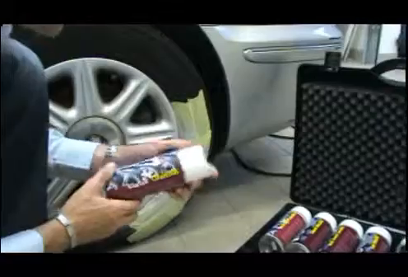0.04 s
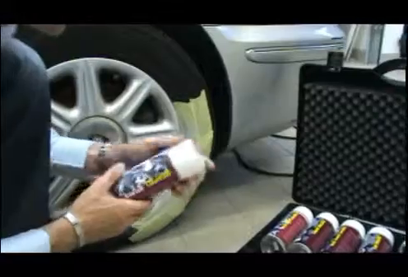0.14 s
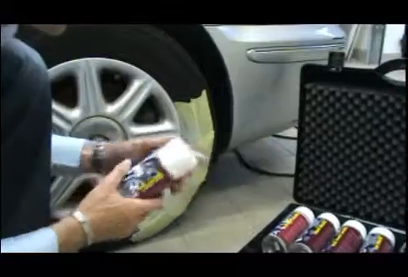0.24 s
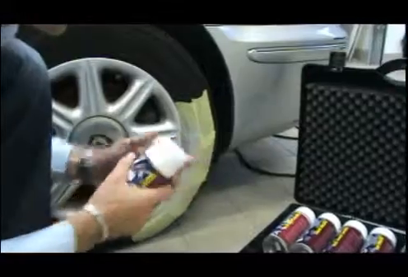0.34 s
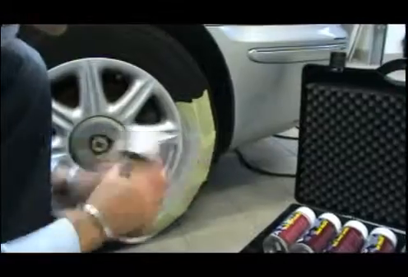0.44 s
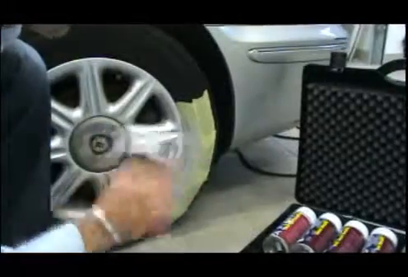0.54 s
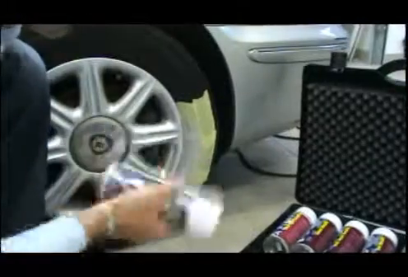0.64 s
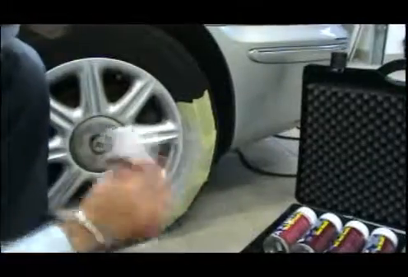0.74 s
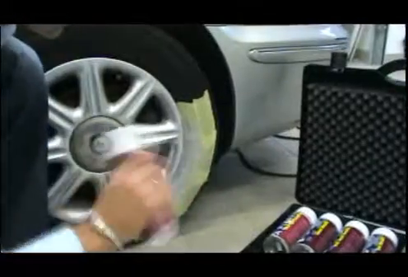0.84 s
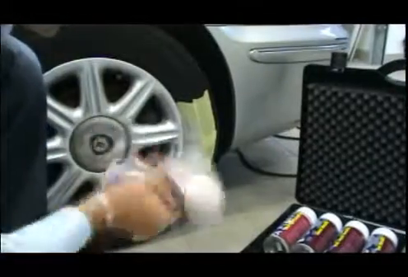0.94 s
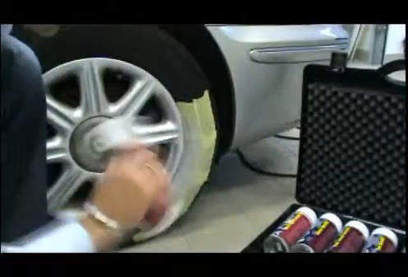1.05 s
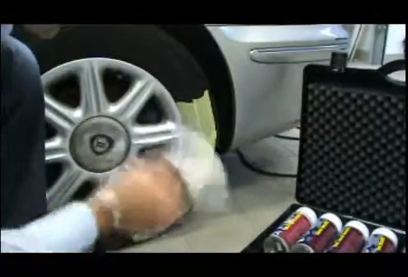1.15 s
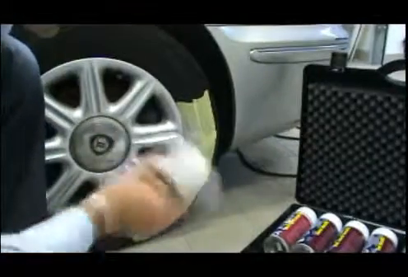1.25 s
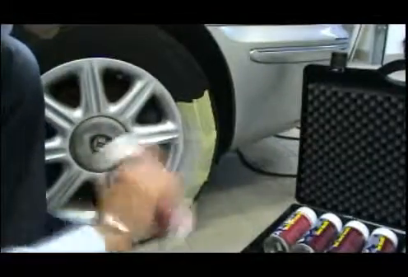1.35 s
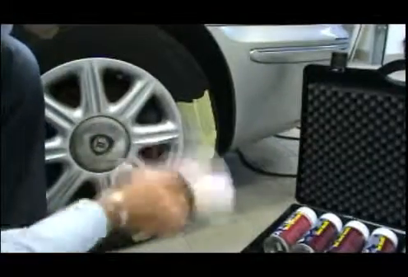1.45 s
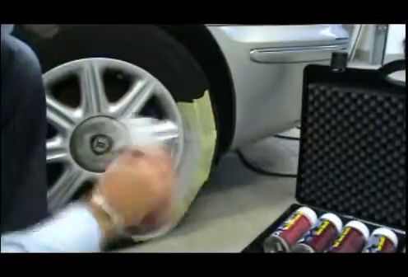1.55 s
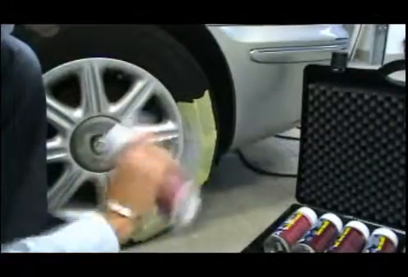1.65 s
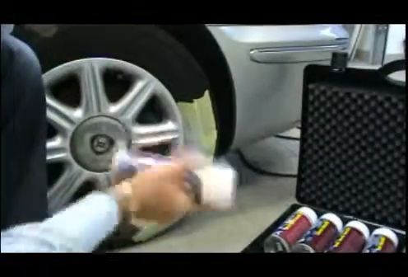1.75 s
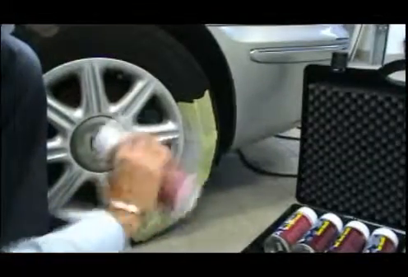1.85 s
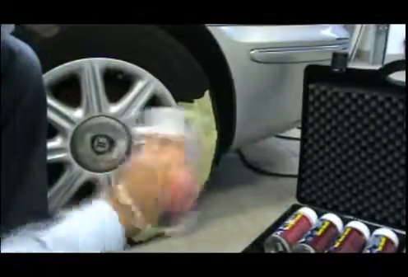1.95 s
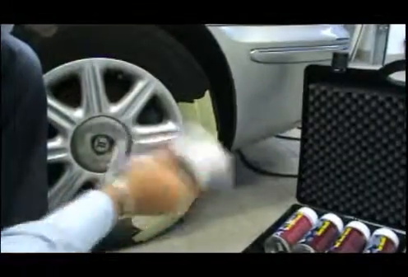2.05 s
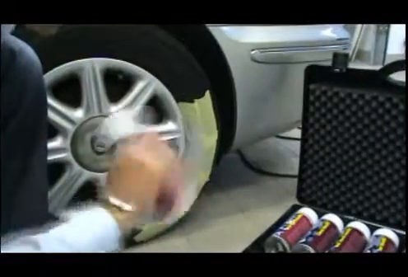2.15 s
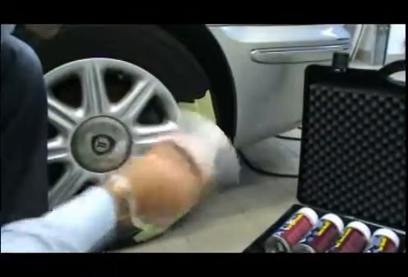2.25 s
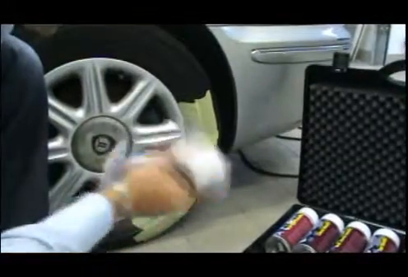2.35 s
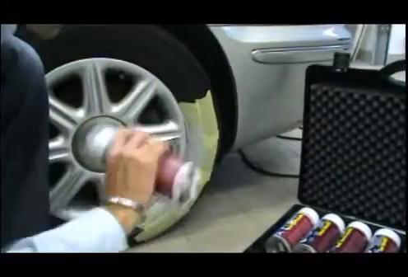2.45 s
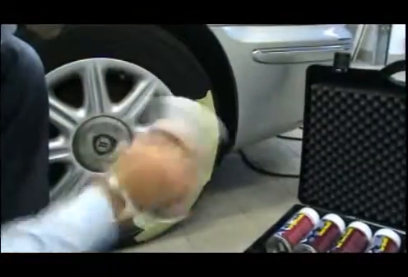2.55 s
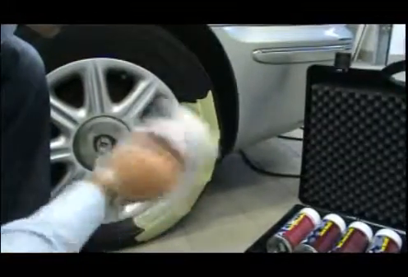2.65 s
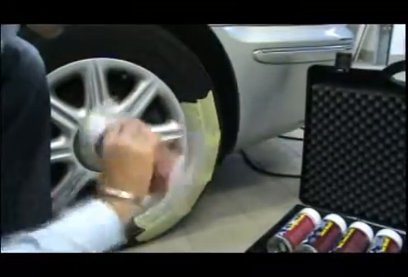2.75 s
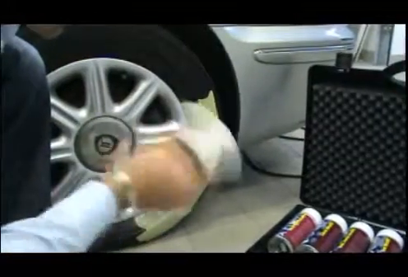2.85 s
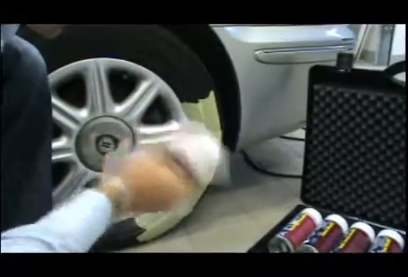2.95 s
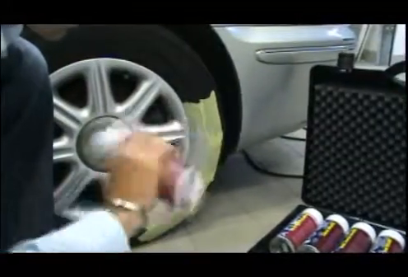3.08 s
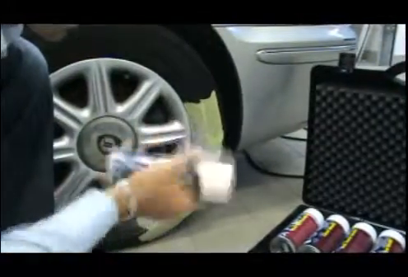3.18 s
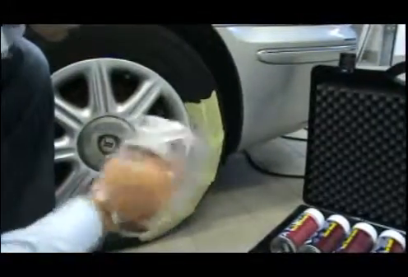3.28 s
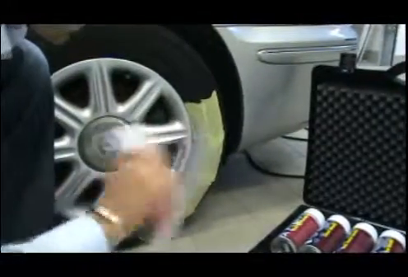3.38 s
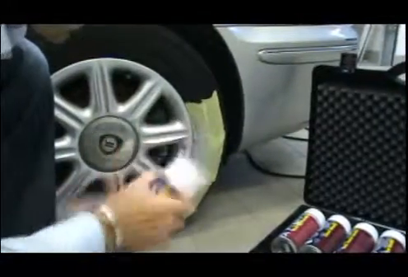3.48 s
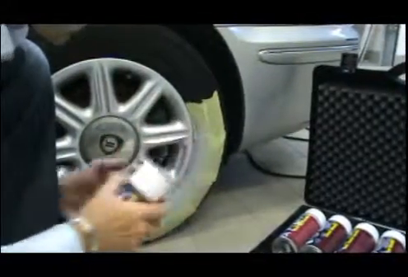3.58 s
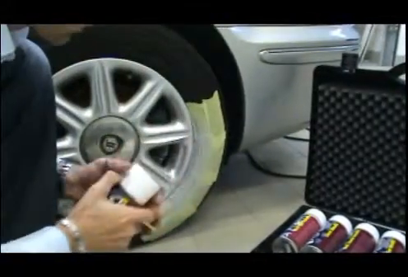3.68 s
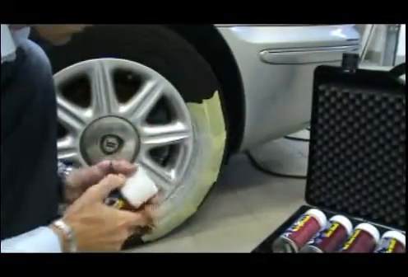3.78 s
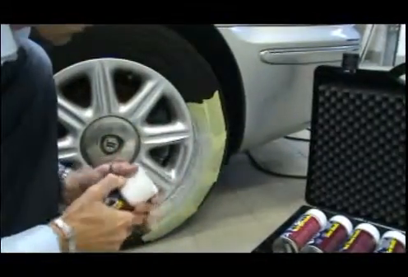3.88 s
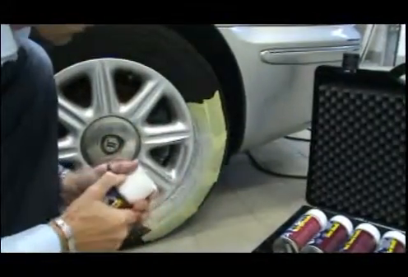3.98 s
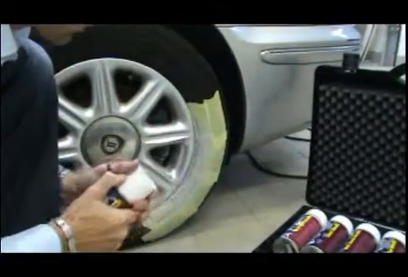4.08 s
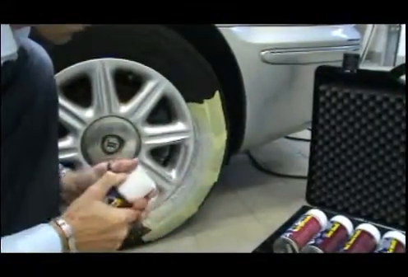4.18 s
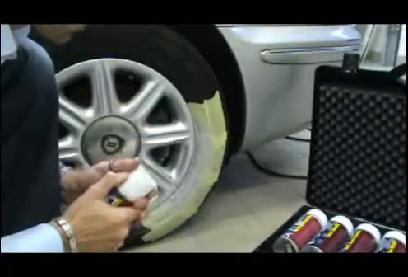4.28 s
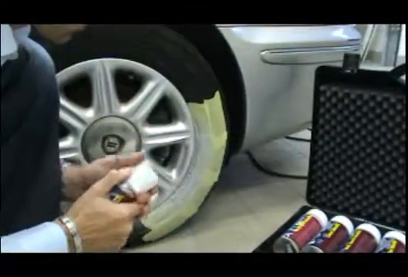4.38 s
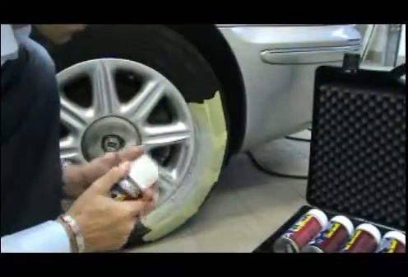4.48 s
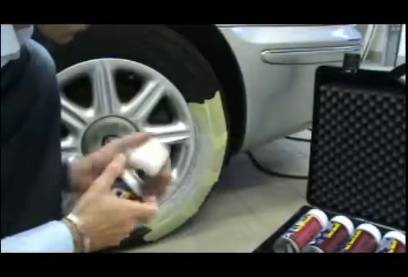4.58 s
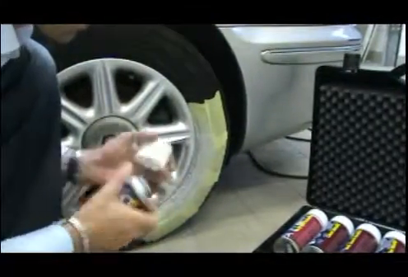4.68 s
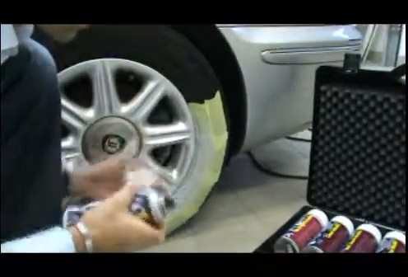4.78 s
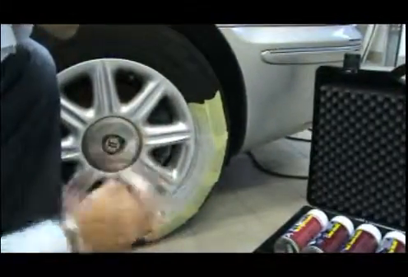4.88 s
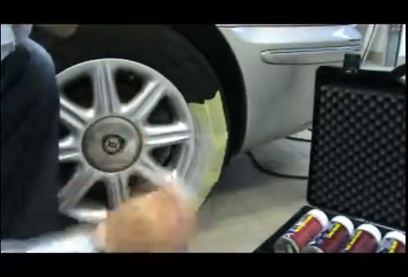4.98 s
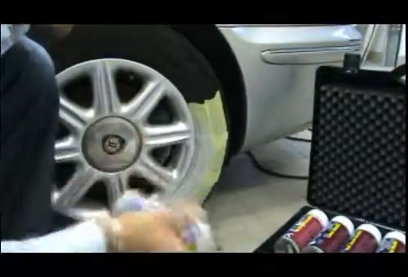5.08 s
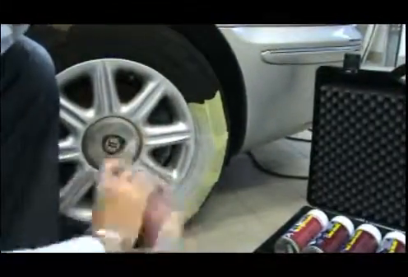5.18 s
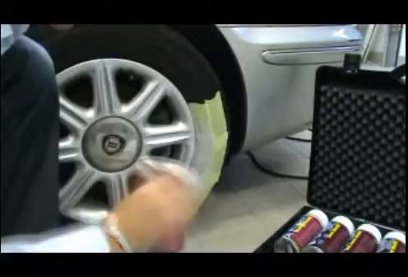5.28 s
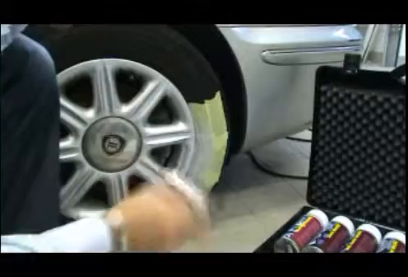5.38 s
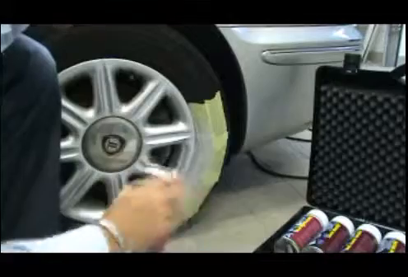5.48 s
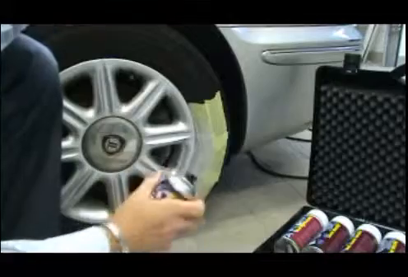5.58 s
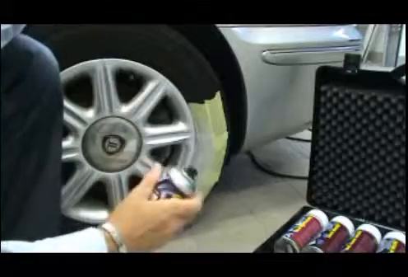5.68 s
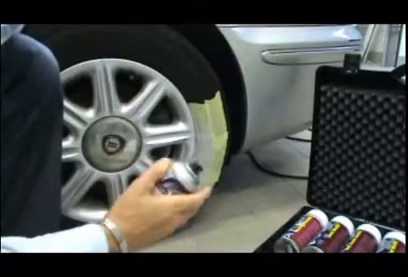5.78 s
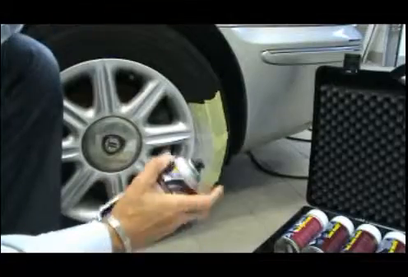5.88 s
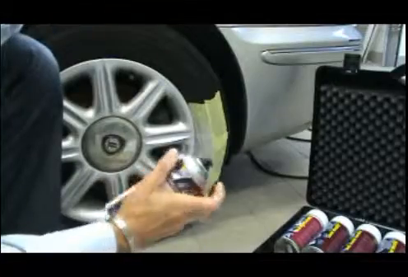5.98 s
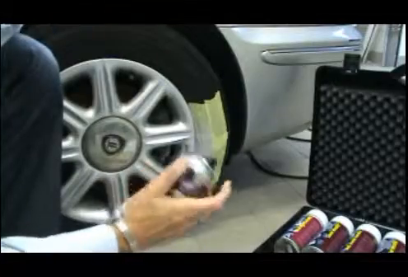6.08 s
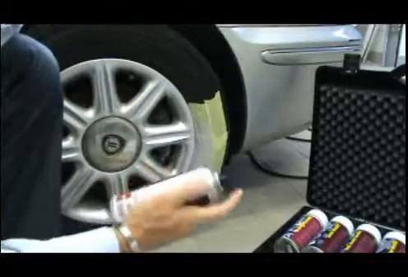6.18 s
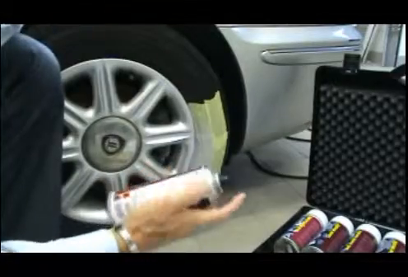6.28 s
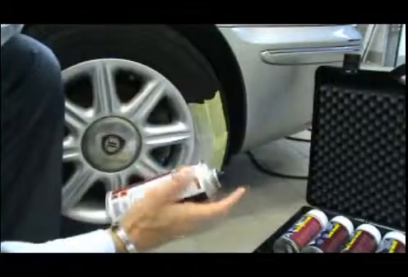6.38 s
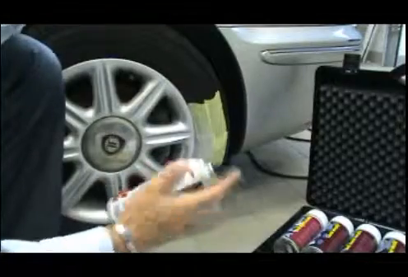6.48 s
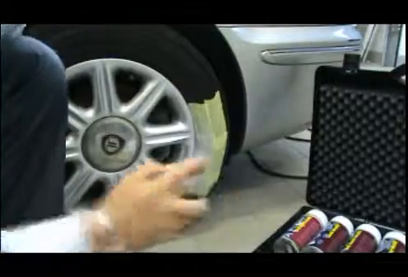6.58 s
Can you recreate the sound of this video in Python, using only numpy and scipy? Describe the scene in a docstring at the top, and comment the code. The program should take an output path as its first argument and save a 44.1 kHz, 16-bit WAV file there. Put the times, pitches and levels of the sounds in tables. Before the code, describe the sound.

A spray paint can is shaken hard, its mixing ball rattling; then the cap pops off hollowly and the can is shaken briefly again.

```python
"""Workshop: a can of spray paint is shaken by hand, its mixing ball rattling on the wall and domed ends.
The shaking dies down, the plastic cap comes off with a hollow pop, and the can is shaken again and turned over.
Strikes are noise bursts through steel modes; damped sines make the cap's air; shaped noise makes sleeves and still air.
Echoes, a treble reflection to one side and a short diffuse tail form the room."""
import sys
import numpy as np
from scipy import signal
from scipy.fft import rfft, irfft
from scipy.io import wavfile

SR = 44100
rng = np.random.default_rng(int(sys.argv[2]) if len(sys.argv) > 2 else 0)


def transcribe(signal):
    """Save signal, clipped to [-1, 1], as a 16-bit WAV file at the path in sys.argv[1]."""
    frames = np.atleast_2d(signal).T
    limited = np.clip(frames, -1, 1)
    pcm = np.round(limited * 32767).astype(np.int16)
    wavfile.write(sys.argv[1], SR, pcm)


N = 292383
TIME_S = np.arange(N) / SR

# still air, relative spectrum: [f/Hz, density/dB per Hz]
AIR_SPECTRUM = [(20, -8), (50, 8), (200, 0.5), (600, -2.5), (1800, -3), (6500, -3), (14000, -8)]
# diffuse tail by band: [f/Hz, t60/s, level/dB, side relative to mid/dB]
ROOM_TAIL = [(103.5, 0.71, -4, -14), (298, 0.86, -5, -1.5), (796, 0.6, -7.5, -4.5), (2020, 0.51, -9, -10.5),
             (5770, 0.49, -14.5, -5), (12700, 0.21, -10, -33)]
# echoes from the floor and the car body: [delay/s, level/dB, cut-off f/Hz]
ROOM_ECHOES = [(.0085, -21, 8700), (0.031, -23, 6740)]
# sleeve cloth, relative spectrum: [f/Hz, density/dB per Hz]
CLOTH_SPECTRUM = [(60, -30), (200, -19), (1300, -3.5), (2100, 1.5), (3000, 0.5), (4400, 3.5), (6000, -2.5),
                  (8000, -5), (13000, -7.5)]
# the arm moves and the sleeves rub: [from t/s, to t/s, level/dB]
ARM_MOVES = [(0.183, 0.552, -62.5), (0.906, 3.45, -53), (4.979, 5.03, -56.5), (5.105, 5.297, -51),
             (6.138, 6.301, -60.5)]
# ball rolls or palm slides, one resonance sings: [from t/s, to t/s, f/Hz, width/Hz, level/dB]
RUBS = [(0, 0.286, 4300, 1000, -68.5), (0.45, 0.56, 4300, 170, -49), (0.545, 0.593, 6300, 120, -49),
        (0.703, 0.738, 4270, 130, -41.5), (6.24, 6.35, 1279, 130, -71)]
# strike coupling to the cap and the air under it, gone once the cap is off: [t/s, gain/dB]
CAP_COUPLING = [(.78, -34), (.84, -17), (3.0, -14), (4.25, -10.5), (4.32, -72)]
# air in the cap as it comes off: [f/Hz, level/dB, t60/s]
POP_MODES = [(131, -43, 0.15), (214, -27, 0.036), (272.2, -37.5, 0.061), (451, -39, 0.061),
             (710, -21, 0.044), (779, -23, 0.073)]
# resonances of the steel ends: [f/Hz, width/Hz, level/dB]
END_MODES = [(1035, 96, -6), (1395, 353, -3.5), (1770, 205, 3), (2220, 270, 3.5), (2835, 242, 0)]
# resonances of the steel wall: [f/Hz, width/Hz, level/dB]
WALL_MODES = [(4030, 1260, -8.5), (5180, 135, -7), (5530, 520, -4.5), (6610, 740, -0.5), (7500, 530, -1.5),
              (8130, 170, -3.5), (11130, 270, -11), (12500, 1200, -10.5)]
# sharp rings of the can, damped by a firm hand; up to 3 kHz the gas inside rings, above it the steel wall:
# [f/Hz, width/Hz, gain/dB]
CAN_RINGS = [(1770, 50, 12), (2195, 130, 10), (2600, 120, 9), (3020, 110, 10), (4285, 70, 13),
             (6275, 40, 3), (7500, 110, 2), (8760, 120, 5)]
# how loosely the can is held: [t/s, ring gain/dB]
LOOSENESS = [(.79, 0), (.84, -26)]
# strike on an end, tail soon damped by the paint: [crack/s, tail level/dB, tail/s]
END_BLOW = (0.0043, -0.84, 0.0094)
# strike on the wall, tail damped likewise: [crack/s, tail level/dB, tail/s]
WALL_BLOW = (0.0033, -2.5, 0.0098)
# shaking effort, 0 at full swing: [t/s, level/dB]
EFFORT = [(.37, 1), (.47, -4.5), (.68, -0.5), (3.45, -1), (3.7, -8), (3.9, -9.5), (5.09, -0.5), (5.48, 2),
          (5.6, -2)]
# how freely the ball skips after a strike: [t/s, level/dB]
SKIPPING = [(.75, -5), (1.0, 0), (4.2, 0), (5.3, -7)]
# aim of wall strikes as the can is tipped and gripped; lower is brighter: [t/s, aim/dB]
WALL_AIM = [(.85, -22), (1.0, -14), (1.25, -8), (3.4, -5), (5.1, -14.5)]
# shakes, about seven a second within a bout; ball meets an end, may bounce, flies to the wall, rattles:
# [t/s, aim/dB (above 0 dull ends, below 0 bright wall), end bounce/s (0: none), flight/s,
#  first wall bounce/s, wall bounces/count]
SHAKES = [(.365, -21.5, 0.028, 0.1, .018, 1), (.667, 0.5, 0, 0.036, 0.016, 3),
          (.784, 2.5, .014, 0.058, .011, 1), (.949, 3.5, 0.012, 0.053, .026, 1),
          (1.0598, 3.5, .01, .059, .0087, 1), (1.1985, 5, 0.015, 0.025, 0.013, 3),
          (1.329, 5, 0.00014, 0.051, .0277, 1), (1.461, 4, 0.024, .052, 0.02, 2),
          (1.5996, 2, 0, 0.039, .0236, 1), (1.751, 5, 0.00031, 0.035, 0.052, 1),
          (1.88, 8.5, 0.008, 0.074, .0254, 2), (2.023, 4, .016, .037, 0.014, 1),
          (2.144, 0.5, 0.021, 0.081, 0.026, 1), (2.295, -8, 0.000087, 0.081, 0.013, 1),
          (2.456, 6.5, 0, 0.032, 0.04, 1), (2.596, -0.5, 0, .048, .047, 1), (2.765, 9, 0, 0.03, .015, 1),
          (2.846, -1, 0.00066, 0.011, .0146, 2), (2.945, -2.5, 0.00054, 0.036, 0.029, 1),
          (3.0474, 6, 0, 0.032, 0.031, 4), (3.222, -2.5, 0, .037, .0135, 2),
          (3.372, -6.5, 0.00074, .0407, .056, 1), (3.613, 8, 0.00065, 0.043, 0.013, 1),
          (3.71, 10, 0, .027, 0.025, 1), (3.81, -3.5, 0.01, .045, 0, 0),
          (5.088, -0.5, 0.017, 0.031, 0.014, 1), (5.198, -1.5, 0, .051, 0.027, 1),
          (5.418, 6.5, 0, .03, 0, 0), (5.483, 8, 0.022, .046, 0.058, 1)]
# further strikes of the ball: bounces and chatter within the shakes, lone knocks between them and in
# handling: [t/s, level/dB, aim/dB]
FURTHER_STRIKES = [(.453, -36, -16), (.511, -37.5, -18), (0.52, -39, -14), (.535, -38, -18),
                   (.549, -37, -22), (.567, -39.5, -21), (.58, -39.5, -20), (.691, -31.5, -7),
                   (.868, -36, 6), (0.9117, -36, 14), (.925, -31.5, -21), (.977, -37.5, 8),
                   (1.1705, -34, 6), (1.296, -30.5, -11), (1.344, -37.5, 9), (1.39, -36, -1),
                   (1.44, -32.5, -13), (1.54, -32.5, 0), (1.7, -35.5, -9), (1.716, -31.5, -10.5),
                   (1.806, -36.5, 6), (1.831, -35, 9), (1.8544, -34, -8), (1.924, -39.5, 14),
                   (1.946, -38.5, 1), (1.9896, -32, -5.5), (2.117, -31.5, -1), (2.177, -36, 8),
                   (2.281, -35, -7), (2.4158, -35, -9), (2.428, -35, -8), (2.556, -33.5, -2),
                   (2.5766, -34, -7.5), (2.704, -37.5, -3), (2.716, -38, -4), (2.727, -34.5, -4),
                   (2.817, -35, -16), (2.838, -36, -5), (2.991, -36.5, 1), (3.306, -37.5, 0),
                   (3.555, -31, -4.5), (3.568, -34, -2), (3.586, -37, 0), (3.886, -47.5, 2),
                   (3.935, -36.5, 2), (3.951, -40, -11), (3.959, -41, -5.5), (3.9985, -44, -2),
                   (4.008, -39, -12), (4.038, -46, -9), (4.047, -39.5, -3), (4.076, -48, 13),
                   (4.091, -45, -3), (4.126, -49, -10), (4.135, -42.5, -5), (4.419, -38.5, 2),
                   (4.436, -44.5, -9), (4.485, -39.5, -6), (4.54, -43, -9.5), (4.995, -37.5, -8),
                   (5.0145, -39, -15), (5.024, -36, -14), (5.05, -38, -17), (5.1313, -33.5, -11),
                   (5.1528, -38.5, -6), (5.159, -31.5, -11), (5.216, -38, 4), (5.287, -36, -3),
                   (5.3606, -30.5, 4.5), (5.436, -37, 5), (5.555, -40.5, 7), (5.578, -40, 5),
                   (5.676, -40, 7), (5.693, -31, -9), (5.714, -44, 11), (5.769, -40.5, -2),
                   (5.8113, -34.5, -7), (5.8215, -35, -7), (5.8656, -41, 4), (5.917, -37.5, -8),
                   (5.973, -42.5, -13), (5.988, -32, -12.5), (6.107, -45, -11), (6.136, -41.5, -11),
                   (6.162, -48, -17), (6.1746, -37, -12), (6.2142, -41, -9.5), (6.243, -48, 8),
                   (6.26, -47, -13), (6.271, -42.5, -8.5), (6.318, -41, -11.5), (6.347, -51, -6),
                   (6.371, -49.5, -6.5), (6.41, -52, -13)]

SHAKES_PER_S, SWING_SHARE = 7, .25   # the can swings by this share of its distance from the wheel
SLEEVE_SWELL_S, SLEEVE_FADE_S = 0.034, 0.13
CAP_HZ, CAP_T60_S, CAP_DETUNE = 720, .1, .011   # detune: spread as a share of pitch
POP_S, SLIP_LEAD_S = 4.390, .038   # the rim slips this long before the pop
SETTLE_FROM_S, SETTLE_TO_S = 4.158, 4.245   # the ball comes to rest
# strikes at full swing; a gentle shake barely carries the ball to the end
END_DB, END_FOLLOWS_DB_PER_DB, WALL_DB = -30.5, 1.23, -28.5
# each bounce is weaker; the gaps close in on a steady chatter
BOUNCE_LOSS_DB, CHATTER_S, GAP_KEPT = 1.1, .016, .3
# strike-to-strike spread of mode level, and of pitch as a share
MODE_VARY_DB, END_DETUNE, WALL_DETUNE = 4, .06, .025
PEAK_TOP, CUTOFF_HZ = .22, 14600   # peaks are rounded toward this share of full scale


def from_db(db):
    """Level in dB to amplitude."""
    return 10 ** (np.asarray(db) / 20)


def rms_one(x):
    """Scale to rms 1."""
    return x / np.sqrt(np.mean(x ** 2) + 1e-20)


def in_time(rows, s=TIME_S):
    """A curve read at the times s."""
    return np.interp(s, *np.transpose(rows))


def at_hz(points, hz, axis=1):
    """One column of a spectrum, read on a log-frequency axis."""
    points = np.array(points)
    return np.interp(np.log(np.maximum(hz, 1)), np.log(points[:, 0]), points[:, axis])


def butter(x, hz, kind, order=2):
    """Butterworth filter."""
    sos = signal.butter(order, np.minimum(hz, .48 * SR), kind, fs=SR, output="sos")
    return signal.sosfilt(sos, x)


def noise(spectrum):
    """Noise of the given colour, rms 1."""
    hz = np.arange(N // 2 + 1) * SR / N
    colour = from_db(at_hz(spectrum, hz))
    return rms_one(irfft(rfft(rng.standard_normal(N)) * colour, N))


def resonate(x, hz, width_hz):
    """A two-pole resonance with gain 1 on top."""
    r = np.exp(-np.pi * width_hz / SR)
    zeros = np.array([1, 0, -1]) * (1 - r * r) / 2
    poles = [1, -2 * r * np.cos(2 * np.pi * hz / SR), r * r]
    return signal.lfilter(zeros, poles, x)


def decay_60(t, t60_s):
    """Exponential decay, -60 dB at t60_s."""
    return np.exp(-np.log(1000) * t / t60_s)


def swell(start_s, stop_s, swell_s, fade_s):
    """An envelope that rises, holds from start to stop, and fades."""
    return np.exp(np.minimum(0, np.minimum((TIME_S - start_s) / swell_s, (stop_s - TIME_S) / fade_s)))


def place(times_s, sounds):
    """Short sounds, one a row, laid out at their times."""
    out = np.zeros(N + sounds.shape[1])
    for at, sound in zip(np.clip(times_s * SR, 0, N).astype(int), sounds):
        out[at:at + len(sound)] += sound
    return out[:N]


def still_air():
    """Coloured noise, common to both sides plus a weaker part of opposite sign."""
    return noise(AIR_SPECTRUM) + .2 * noise(AIR_SPECTRUM) * np.array([[1], [-1]])


def room_tail(t, band_count=9):
    """Diffuse mid and side responses: banded noise that mostly dies sooner in the treble."""
    edges_hz, tail = np.geomspace(40, 16000, band_count + 1), 0
    for low, high in zip(edges_hz, edges_hz[1:]):
        t60_s, db, side_db = (at_hz(ROOM_TAIL, np.sqrt(low * high), axis=k + 1) for k in range(3))
        decay = (1 - np.exp(-t / 0.00095)) * decay_60(t, t60_s)
        gain = from_db([[db], [db + side_db]]) / np.linalg.norm(decay)
        tail = tail + gain * decay * butter(rng.standard_normal((2, SR)), [low, high], "band")
    return tail


def workshop(x, wheel_s=0.0023, wheel_db=-12, wheel_hz=(5000, 11000)):
    """Direct sound, echoes, a treble reflection to one side and a diffuse tail; two channels."""
    tail = room_tail(TIME_S[:SR])
    mid, side = signal.fftconvolve(x[None], tail, axes=1)[:, :N]
    echoes = sum(from_db(db) * np.interp(TIME_S - s, TIME_S, butter(x, hz, "low"), left=0)
                 for s, db, hz in ROOM_ECHOES)
    # a wheel's spokes reflect treble from one side, sooner or later as the can swings
    delay_s = wheel_s * (1 + SWING_SHARE * np.sin(2 * np.pi * SHAKES_PER_S * TIME_S))
    wheel = from_db(wheel_db) * np.interp(TIME_S - delay_s, TIME_S, butter(x, wheel_hz, "band"), left=0)
    return x + echoes + mid + (side + wheel) * np.array([[1], [-1]])


def sleeves():
    """Cloth noise swells with each move of the arm, holds, and fades after it."""
    envelope = sum(from_db(db) * swell(start, stop, SLEEVE_SWELL_S, SLEEVE_FADE_S)
                   for start, stop, db in ARM_MOVES)
    return noise(CLOTH_SPECTRUM) * envelope


def hand_bump(at_s, db, swell_s=0.021, fade_s=0.062):
    """The hand lets go of the cap, or grips the can anew: a soft, dull noise bump."""
    late_s = TIME_S - at_s
    envelope = np.exp(-np.maximum(-late_s / swell_s, late_s / fade_s))
    return from_db(db) * envelope * noise([(30, -20), (115, -9.0), (600, -18.5), (2000, -20), (5000, -38)])


def rubbing(swell_s=0.014, fade_s=0.022):
    """Rolling and sliding contact keeps single resonances of the can singing."""
    out = 0
    for start, stop, hz, width_hz, db in RUBS:
        tone = resonate(resonate(rng.standard_normal(N), hz, width_hz), hz, width_hz)
        out = out + from_db(db) * swell(start, stop, swell_s, fade_s) * rms_one(tone)
    return out


def cap_force(s, db, aim_db):
    """The share of each strike that reaches the cap: much from the wall, little from the ends."""
    wall_loss_db = 20 * np.log10(1 + from_db(aim_db) ** 2)
    return from_db(db - wall_loss_db + in_time(CAP_COUPLING, s))[:, None]


def cap_hum():
    """Strikes on the wall set the air under the cap humming, each with its own strength and pitch."""
    s, db, aim_db = strikes()
    t = TIME_S[:SR // 4]
    vary_db, bend = rng.normal(0, [2, CAP_DETUNE], (len(s), 2)).T[:, :, None]
    hum = np.sin(2 * np.pi * CAP_HZ * (1 + bend) * t) * decay_60(t, CAP_T60_S)
    return butter(place(s, cap_force(s, db, aim_db) * from_db(vary_db) * hum) + 1e-18, 410, "high")


def cap_pop(snap_db=-33, slip_db=-59, open_s=0.0016):
    """The plastic rim slips, then snaps over its bead; the air in the cap rings up as the gap opens."""
    at_s, t = np.array([POP_S]), TIME_S[:SR // 4]
    slip = shell([(707, 320, -4), (1400, 1400, -13)], 1, crack_s=0.017, tail_db=-15, tail_s=0.011)
    snap = shell([(2425, 1460, -7.5), (3850, 560, -15), (6690, 3900, -12.5)], 1,
                 crack_s=0.0079, tail_db=1, tail_s=0.013)
    air = sum(from_db(db) * np.sin(2 * np.pi * hz * t) * decay_60(t, t60_s) for hz, db, t60_s in POP_MODES)
    air = air * (1 - np.exp(-t / open_s))
    plastic = from_db(slip_db) * place(at_s - SLIP_LEAD_S, slip)
    plastic = plastic + from_db(snap_db) * butter(place(at_s, snap), 10200, "low")
    return plastic + place(at_s, air[None])


def shell(modes, count, crack_s, tail_db, tail_s, vary_db=0, detune=0, size=2048):
    """Blows on a thin shell: a click, waves round it for a few ms, a dying tail; rms 1 in the first 5 ms."""
    t, f = np.arange(size) / SR, np.arange(size // 2 + 1) * SR / size
    shape = np.exp(-np.square(t / crack_s) ** 2) + from_db(tail_db) * np.exp(-t / tail_s)
    click = 6.5 * rng.standard_normal((count, 1)) * (t == 0)   # square blows crack, glancing ones less
    spectrum = 0
    for hz, width_hz, db in modes:
        push = click + shape * rng.standard_normal((count, size))
        # each contact point favours other modes; the sloshing paint shifts their pitch
        gain = from_db(db + vary_db * rng.standard_normal((count, 1)))
        pitch_hz = hz * np.exp(detune * rng.standard_normal((count, 1)))
        damping = 1j * f * width_hz
        spectrum = spectrum + gain * rfft(push) * damping / (pitch_hz ** 2 - f ** 2 + damping)
    out = irfft(spectrum, size)
    return out / np.sqrt(np.mean(out[:, t < .005] ** 2, axis=1, keepdims=True))


def contacts(s, db, aim_db, gentle_db=-39.0, gentle_hz=11000):
    """The ball meets the steel; its aim shares the energy between ends and wall."""
    end_share = (1 / (1 + from_db(-aim_db) ** 2))[:, None]
    force = from_db(db)[:, None]
    end_shell = shell(END_MODES, len(s), *END_BLOW, vary_db=MODE_VARY_DB, detune=END_DETUNE)
    wall_shell = shell(WALL_MODES, len(s), *WALL_BLOW, vary_db=MODE_VARY_DB, detune=WALL_DETUNE)
    ends = place(s, force * np.sqrt(end_share) * end_shell)
    blows = force * np.sqrt(1 - end_share) * wall_shell
    gentle = db < gentle_db   # a slow ball stays longer in contact and sounds duller
    dull = butter(place(s[gentle], blows[gentle]) + 1e-18, gentle_hz, "low")
    wall = place(s[~gentle], blows[~gentle]) + dull
    free = (wall + 0.29 * ends) * from_db(in_time(LOOSENESS))
    rings = sum(from_db(gain_db) * resonate(free + 1e-18, hz, width_hz)
                for hz, width_hz, gain_db in CAN_RINGS)
    return ends + butter(wall + rings, 1170, "high")   # the narrow wall radiates only treble


def ball_settles(first_db=-51, loss_db=5, aim_db=-7, count=9):
    """When the shaking stops, the ball rocks to rest on the wall in ever quicker, fainter ticks."""
    progress = (np.arange(count) + .5 * rng.random(count)) / count
    s = SETTLE_FROM_S + (SETTLE_TO_S - SETTLE_FROM_S) * np.log2(1 + progress)
    level_db = first_db - loss_db * progress + rng.normal(0, 1, count)
    return contacts(s, level_db, aim_db + rng.normal(0, 2, count))


def ball_skips(loss_db=-12, further_db=-3.0, gap_s=0.0088, spread_db=3, effort_share=0.58, count=5):
    """After a strike the ball skips along the steel, ever more lightly on average, less in a gentle hand."""
    s, db, aim_db = strikes()[:, :, None]
    shape = (len(s), count)
    when_s = s + np.cumsum(gap_s * rng.uniform(.5, 1.5, shape), axis=1)
    first_db = db + loss_db + in_time(SKIPPING, s) + effort_share * in_time(EFFORT, s)
    level_db = first_db + further_db * np.arange(count) + spread_db * rng.standard_normal(shape)
    skip_aim_db = aim_db + 5 * rng.standard_normal(shape)
    touching = when_s < np.append(s[1:], np.inf)[:, None] - gap_s   # it flies free before the next strike
    return contacts(when_s[touching], level_db[touching], skip_aim_db[touching])


def shake(s, aim_db, end_bounce_s, flight_s, wall_bounce_s, count):
    """One shake as rows of (s, dB, aim dB): the end, then the wall, each with its bounces."""
    end_db = END_DB + END_FOLLOWS_DB_PER_DB * in_time(EFFORT, s)
    hits = [(s, end_db, aim_db)]
    if end_bounce_s > 0:
        hits.append((s + end_bounce_s, end_db - BOUNCE_LOSS_DB, aim_db))
    at_s, gap_s = s + flight_s, wall_bounce_s
    wall_db = WALL_DB + in_time(EFFORT, at_s)
    for k in range(round(count) + 1):
        hits.append((at_s, wall_db - k * BOUNCE_LOSS_DB, in_time(WALL_AIM, at_s)))
        at_s, gap_s = at_s + gap_s, CHATTER_S + GAP_KEPT * (gap_s - CHATTER_S)
    return hits


def strikes():
    """Strikes of all shakes and the further ones in order of time, as rows s, dB, aim dB."""
    hits = [hit for row in SHAKES for hit in shake(*row)]
    hits += [tuple(row) for row in FURTHER_STRIKES]
    return np.transpose(sorted(hits))


def ball_strikes(knock_db=-8, knock_hz=690):
    """The ball strikes the steel; while the cap is on, each strike also knocks it."""
    s, db, aim_db = strikes()
    cap_knocks = shell([(knock_hz, 200, 0)], len(s), crack_s=0.0035, tail_db=-8, tail_s=0.0056)
    return contacts(s, db, aim_db) + from_db(knock_db) * place(s, cap_force(s, db, aim_db) * cap_knocks)


def scene(cap_room_db=-4):
    """Can, sleeves and hand in the workshop, over its still air; the cap sounds drier than the steel."""
    air = from_db(-68.5) * still_air()
    hands = hand_bump(at_s=4.595, db=-55.5) + hand_bump(at_s=5.04, db=-64.5)
    cap, wet = butter(cap_hum() + cap_pop(), 147, "high"), from_db(cap_room_db)
    can = rubbing() + ball_settles() + ball_skips() + ball_strikes()
    can = butter(can, 240, "high")   # a small body radiates little bass
    return workshop(can + wet * cap + sleeves() + hands) + (1 - wet) * cap + air


def record(dry, balance_db=.5, treble_hz=12800):
    """The left side is a little louder; peaks are rounded and the top is cut."""
    pair = butter(np.array([dry[0] * from_db(balance_db), dry[1]]), treble_hz, "low", order=7)
    rounded = PEAK_TOP * np.tanh(pair / PEAK_TOP)
    return signal.sosfilt(signal.cheby1(10, .2, CUTOFF_HZ, fs=SR, output="sos"), rounded)


dry = scene()
out = record(dry)
transcribe(out)
```